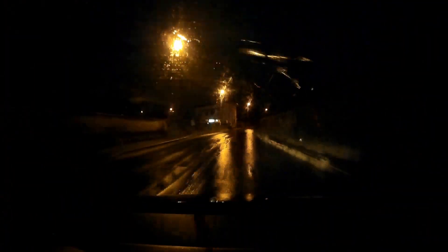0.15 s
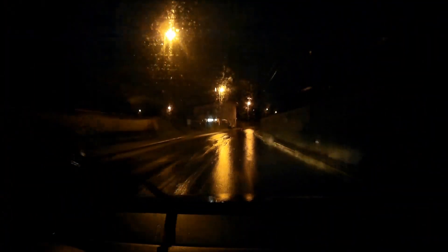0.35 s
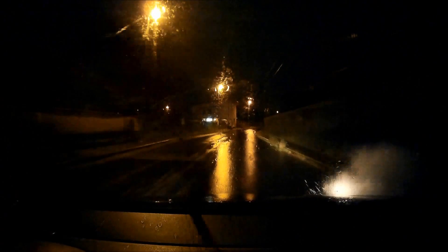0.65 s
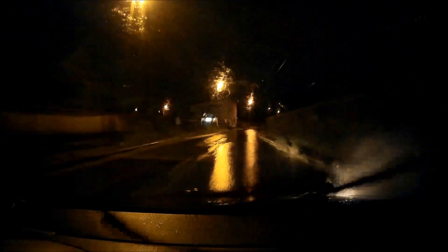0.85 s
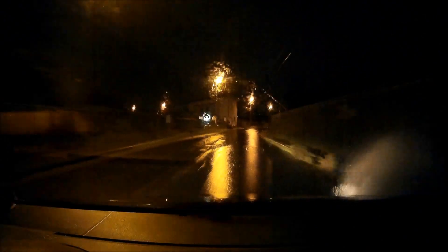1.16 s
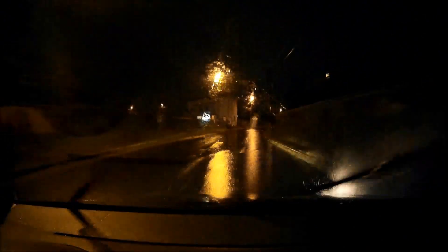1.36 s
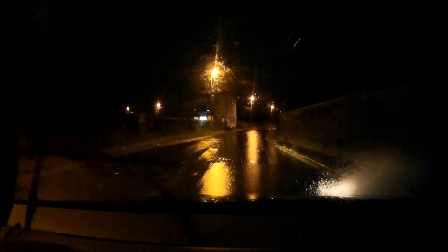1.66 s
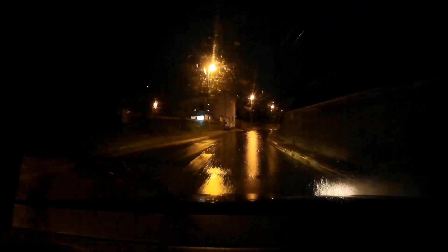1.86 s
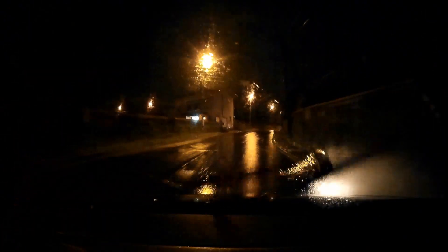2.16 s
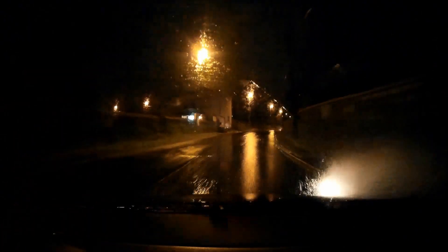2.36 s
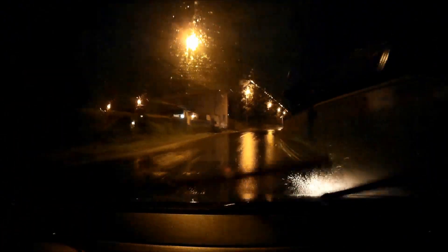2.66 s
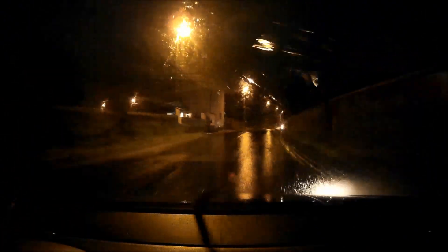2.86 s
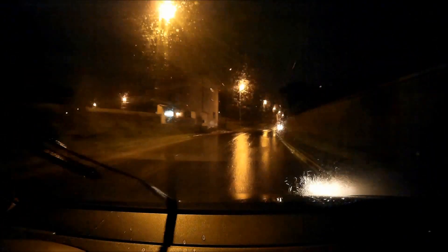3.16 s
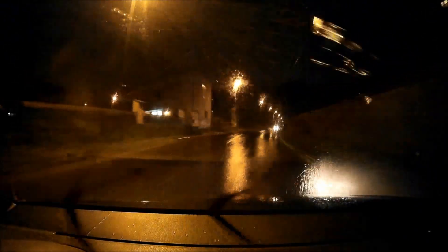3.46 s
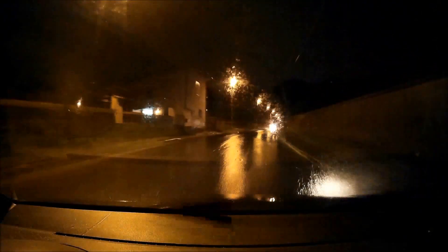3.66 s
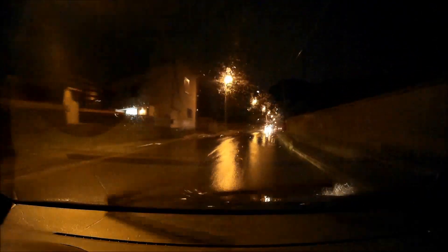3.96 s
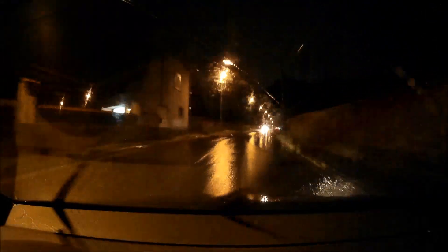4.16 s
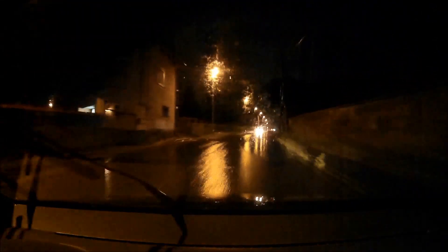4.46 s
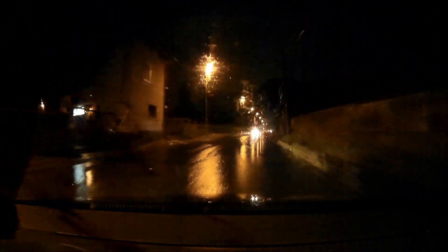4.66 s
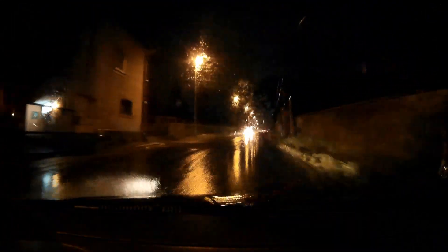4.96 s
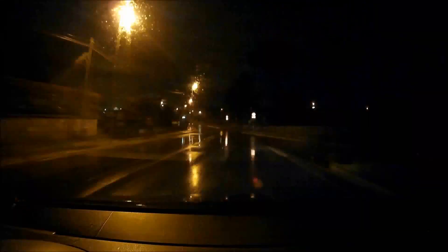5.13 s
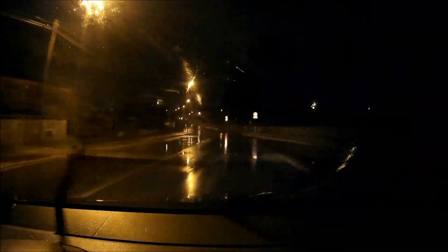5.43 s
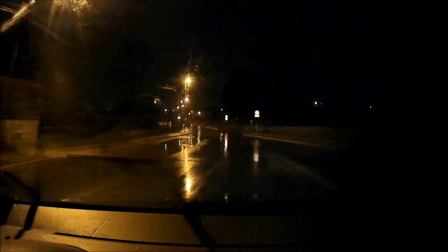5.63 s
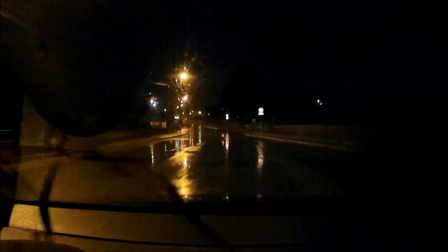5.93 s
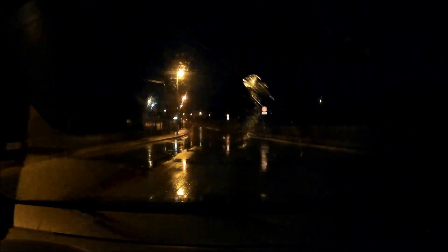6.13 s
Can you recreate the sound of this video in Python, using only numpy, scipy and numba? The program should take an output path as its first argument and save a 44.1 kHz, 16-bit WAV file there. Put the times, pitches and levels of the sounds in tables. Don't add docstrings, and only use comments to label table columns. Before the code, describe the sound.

Inside a car driving through heavy rain, a low engine boom hums while water rumbles and thumps under the floor and drops patter on glass.

```python
import sys
import numpy as np
from scipy import signal
from scipy.fft import rfft, irfft, next_fast_len
from scipy.io import wavfile
from scipy.ndimage import uniform_filter1d
from numba import njit

SR = 44100
rng = np.random.default_rng(int(sys.argv[2]) if len(sys.argv) > 2 else 0)


def volts_from_db(level):
    exponent = np.asarray(level, float) / 20
    return 10 ** exponent


def store_wav(level_fs):
    pcm = np.round(np.clip(np.atleast_2d(level_fs), -1, 1) * 32767)
    wavfile.write(sys.argv[1], SR, pcm.T.astype(np.int16))


N = 277389
T = np.arange(N) / SR
HZ = np.fft.rfftfreq(next_fast_len(N), 1 / SR)


def curves(table):
    s, *columns = np.transpose(table)
    return [np.interp(T, s, c) for c in columns]


def unit(x):
    return x / np.sqrt(np.mean(x ** 2))


def walk(rate):
    k = int(SR / rate)
    held = np.repeat(rng.standard_normal(N // 64), k)[:N]
    return 1.413 * uniform_filter1d(uniform_filter1d(held, k), k)


def humps(s, size, length):
    return sum(a * np.exp(-((T - t) / w) ** 2) for t, a, w in zip(s, size, length + 0 * s))


def lift(hz, resonances):
    return sum(db / (1 + (2 * (hz - f) / width) ** 2) for f, width, db in resonances)


# f/Hz, width/Hz, lift/dB
CABIN = [(62.6, 19, 7.5), (125, 14, 4.5), (178, 4.4, 0), (218, 2.4, 3.5), (354.6, 47, 7.5), (515, 103, 5),
         (770, 26, 6.5), (955, 125, 3), (2540, 420, 2.5)]


def colour(points):
    hz, db = np.transpose(points)
    source_db = np.interp(np.log(HZ + 1), np.log(hz), db, left=-120, right=-120)
    return volts_from_db(source_db + lift(HZ, CABIN))


def restless(source, points, slow_db, flicker_db, rate):
    spectrum = rfft(source, 2 * len(HZ) - 2) * colour(points)
    swell = walk(rate)
    octave = np.log2(HZ + 1)
    lowest, highest = np.log2(points[0][0]), np.log2(points[-1][0])
    out = 0
    for centre in np.arange(lowest, highest + .5, .5):
        window = np.cos(np.pi * np.clip(octave - centre, -.5, .5)) ** 2
        band = irfft(spectrum * window)[:N]
        out = out + band * volts_from_db(slow_db * swell + flicker_db * walk(rate * 1.7))
    return unit(out)


@njit
def rings(start, hz, t60, size, n, sr):
    out = np.zeros(n)
    for k in range(len(start)):
        turn = np.exp(2j * np.pi * hz[k] / sr - np.log(1000.) / (t60[k] * sr))
        z = size[k] + 0j
        for i in range(int(start[k] * sr), min(n, int((start[k] + t60[k]) * sr))):
            out[i] += z.imag
            z *= turn
    return out


def strike(s, hz, db, t60, spread, count, smear_s=0.0019):
    chance = rng.standard_normal((len(s), count, 3))
    f = np.clip(hz[:, None] * 2 ** (spread * chance[..., 0]), 50, .45 * SR)
    start = s[:, None] + smear_s * np.abs(chance[..., 1])
    size = volts_from_db(db[:, None] + 1.1 * chance[..., 2]) / np.sqrt(count)
    t60 = np.repeat(t60 + 0 * s, count)
    return rings(start.ravel(), f.ravel(), t60, size.ravel(), N, 1. * SR)


def burst(s, db, t60, low_hz, high_hz, rise_s=0.00039):
    envelope = np.zeros(N)
    for start, size, length in zip(s, volts_from_db(db), t60 + 0 * s):
        k = np.arange(int(start * SR), min(N, int((start + length) * SR)))
        age = (k - k[0]) / SR
        envelope[k] += size * 1000. ** (-age / length) * np.minimum(age / rise_s, 1)
    band = signal.butter(2, [low_hz, high_hz], "band", fs=SR, output="sos")
    noise = signal.sosfilt(band, envelope * rng.standard_normal(N))
    return noise * np.sqrt(SR / 2 / (high_hz - low_hz))


def shower(per_s, spread_db, tail_s):
    hits = (rng.random(N) < per_s / SR) * volts_from_db(spread_db * rng.exponential(size=N).clip(0, 3.2))
    tail = np.exp(-np.arange(1024) / (tail_s * SR))
    power = signal.fftconvolve(hits ** 2, tail ** 2)[:N].clip(0)
    return unit(np.sqrt(power) * rng.standard_normal(N))


# t/s, f/Hz, level/dB
BOOM = [(0.0, 40.1, -6.5), (0.17, 36.58, -16), (0.65, 35.36, -18.5), (1.05, 34.4, -18), (1.28, 33.7, -12.5),
        (1.45, 34.48, -17.5), (2.1, 34.01, -14), (2.67, 34.08, -15.5), (2.8, 41.2, -29.5),
        (3.06, 48.1, -21), (3.47, 47.7, -33), (3.7, 37.68, -29), (3.8, 36.02, -16), (4.05, 42.53, -19.5),
        (5.12, 42.66, -18.5), (5.3, 45.34, -21), (5.6, 44.98, -26.5), (6.29, 46.44, -20)]
# t/s, depth/dB, length/s
FALTERS = [(0.05, 17.5, 0.064), (0.723, 16, 0.026), (2.79, 22, 0.017), (2.991, 18, 0.047),
           (3.167, 27, 0.042), (3.285, 22, 0.055), (3.544, 2, 0.021), (3.67, 3, 0.031), (3.749, 14, 0.023),
           (3.855, 10, .02), (3.95, 4, 0.031), (5.205, 7, 0.038), (5.423, 14, 0.041), (5.777, 8, 0.027),
           (5.911, 21, 0.029), (6.08, 15, .02)]
# multiple, level at full load/dB
OVERTONES = [(2, -36.5), (3, -47), (4, -43), (5, -44.5)]
# f/Hz, width/Hz, lift/dB
EXHAUST = [(225.7, 6.4, 3), (130, 14, 6)]


def engine():
    full_load_db, overtone_follow = -16.5, 0.84
    hz, db = curves(BOOM)
    phase = 2 * np.pi * np.cumsum(hz * (1 + 0.00632 * walk(12))) / SR
    tone = volts_from_db(db - humps(*np.transpose(FALTERS)) + 0.88 * walk(21.9)) * np.sin(phase)
    for k, level_db in OVERTONES:
        level_db = level_db + overtone_follow * (db - full_load_db) + lift(k * hz, EXHAUST)
        tone += volts_from_db(level_db + 1.7 * walk(15)) * np.sin(k * phase + 0.88 * walk(9))
    return np.sqrt(2) * tone


# t/s, level/dB, length/s, f/Hz
DRONES = [(.2, -33.5, 0.19, 126.5), (1.328, -32, 0.17, 221), (1.7, -39, 0.28, 131.4),
          (2.1, -34.5, 0.16, 133), (3.97, -28, .14, 127), (4.397, -35, 0.23, 127),
          (.84, -31.5, 0.057, 120.4), (1.08, -32.5, .07, 134), (4.08, -32, 0.079, 178),
          (3.95, -33.5, .1, 221.6), (4.8, -28, 0.12, 126.7), (5.05, -34, 0.056, 127.2),
          (5.286, -31.5, 0.096, 220.8), (4.45, -33, 0.061, 178), (6.049, -34, 0.27, 92.8),
          (6.2, -32, 0.074, 122.4), (1.93, -33, .08, 130), (.63, -33, .07, 120), (.72, -35, .06, 150),
          (.38, -35, .06, 125), (4.6, -35, .08, 128), (3.42, -36, .08, 140), (3.57, -36, .06, 150),
          (3.9, -34, .08, 158), (4.12, -33, .05, 150), (5.12, -35, .1, 385), (5.08, -37, .08, 540),
          (5.78, -35, .07, 215), (1.53, -37, .06, 780)]


def drones():
    tones = 0
    for s, db, length, hz in DRONES:
        tones = tones + volts_from_db(db) * np.exp(-((T - s) / length) ** 2) * np.sin(2 * np.pi * hz * T)
    return np.sqrt(2) * tones


# t/s, level/dB
ROAD = [(0.0, -25), (0.45, -28), (0.6, -27), (1.0, -30), (1.35, -26), (1.63, -27.5), (2.45, -30),
        (2.6, -23.5), (2.85, -27.5), (2.97, -31), (3.62, -34), (3.94, -28.5), (4.13, -23), (4.24, -32),
        (4.6, -30), (4.8, -29), (5.78, -28.5), (6.29, -39)]
# f/Hz, level per Hz/dB
RUMBLE = [(40, -33), (60, -6), (75, -12.5), (95, -6), (130, -3.5), (240, -7), (450, -27.5), (900, -33)]


def tyres():
    depth_db, = curves(ROAD)
    return volts_from_db(depth_db + 0.13) * restless(rng.standard_normal(N), RUMBLE, 0.94, 1.0, 6)


# t/s, lift/dB (negative where the shaking eases)
JOLTS = [(.41, 13), (.84, 13), (1.29, 9.5), (1.53, 5), (2.15, 7), (2.5, 5), (3.08, 3.5), (3.35, 5.5),
         (4.05, 3.5), (4.29, 0), (4.68, -2), (5.07, 7), (5.62, 8), (5.78, 9), (6.0, 3.5), (6.2, 5.5)]
# f/Hz, level per Hz/dB
SHAKE = [(18, -15.5), (30, -0.5), (45, -9), (58, -2), (72, -15), (95, -10.5)]


def suspension():
    shake_db = -33.5 + humps(*np.transpose(JOLTS), 0.14)
    return volts_from_db(shake_db) * restless(rng.standard_normal(N), SHAKE, 0.52, 0.2, 7.3)


# t/s, lift/dB, length/s
SURGES = [
    (.5, 1.5, 0.22),
    (1.024, 3, 0.13),
    (1.31, 3.5, 0.12),
    (2.063, 1.5, 0.12),
    (2.632, 1, 0.074),
    (3.301, -1, 0.58),
    (3.924, 3, 0.041),
    (4.359, 3, 0.054),
    (4.84, 2, 0.13),
    (5.243, 2.5, 0.24),
]
# f/Hz, level per Hz/dB
WASH = [(150, -20.5), (300, -0.5), (500, -2.5), (800, -3.5), (1050, -9), (1300, -15), (1600, -15),
        (2200, -60)]


def floor_wash():
    (depth_db,), (rain_db,) = curves(ROAD), curves(RAIN)
    wash_db = -32.5 + 0.022 * (depth_db - depth_db.mean()) + 0.49 * (rain_db - rain_db.mean())
    wash_db += humps(*np.transpose(SURGES))
    lumps = rng.standard_normal(N) + 0.37 * shower(150, 4.3, 0.0026)
    return volts_from_db(wash_db) * restless(lumps, WASH, 0.38, 0.22, 9)


# t/s, peak level/dB, ring f/Hz, panel relative level/dB, panel f/Hz
THUMPS = [(0.169, -19.5, 227, -6, 830), (0.248, -22, 216, -12, 553), (1.002, -24.5, 304, 5, 773),
          (1.521, -16.5, 195, -5, 690), (2.533, -22, 164.4, -4, 550.2), (2.57, -25, 169, -1, 830),
          (2.609, -16, 237.7, -21, 551), (2.677, -14.5, 150, -8.5, 565), (2.819, -18, 185, -36, 770),
          (2.89, -16.5, 184, -15, 714), (3.833, -22.5, 190, -3, 770), (3.91, -10, 148, -14, 748),
          (3.978, -28.5, 237, 2, 793), (4.035, -27, 180, -1, 545), (4.108, -12.5, 265, -7, 748),
          (4.17, -19, 200, -16, 940), (4.235, -12.5, 211, -22, 740.8), (5.558, -17, 178, -22, 726),
          (6.209, -30, 316.8, -5, 647.5)]


def floor_thumps():
    rise_s = 0.0042
    s, db, hz, panel_db, panel_hz = np.transpose(THUMPS)
    panel_db = db + panel_db
    thumps = strike(s, hz, db - 5.0, 0.1, 0.274, count=7, smear_s=rise_s)
    thumps += strike(s, panel_hz, panel_db - 1.5, 0.083, 0.097, count=7, smear_s=rise_s)
    thumps += burst(s, db - 13.5, 0.084, 137, 530, rise_s)
    return thumps + burst(s, panel_db - 13.5, 0.16, 500, 1200, rise_s)


# t/s, peak level/dB, f/Hz, t60/s, rise/s
KNOCKS = [(6.0204, -38, 8000, .028, .001), (6.021, -43, 8400, .03, .001), (3.2, -22, 180, 0.074, .004),
          (2.714, -20, 186, .05, .003), (2.655, -20, 155, .06, .004), (5.4, -29, 330, 0.13, 0.011),
          (5.38, -34, 510, .15, .01), (6.1245, -25, 1460, 0.024, 0.002), (2.814, -15, 190, .06, .004),
          (2.826, -19, 310, .04, .003), (2.891, -17, 170, .06, .003), (2.46, -21, 370, .05, .004),
          (2.478, -21, 360, .05, .004), (6.1226, -33, 5100, 0.015, .0006), (6.1228, -35, 5300, .014, .0006),
          (6.123, -33, 2650, .02, .001), (5.6, -34, 4480, .018, .002), (6.2832, -4, 5000, 0.011, 0.0018),
          (6.2835, -12, 5300, .011, .0015), (6.2835, -25, 6200, 0.018, .001),
          (6.283, -28, 3300, 0.018, .001), (6.285, -22, 1840, 0.027, .002), (6.284, -24, 890, .08, .002),
          (6.2835, -30, 6870, .03, .001), (6.284, -33, 8100, .03, .001), (2.6, -14.5, 270, .045, .003),
          (2.889, -22, 726, .05, 0.0018), (3.832, -21, 770, 0.076, .004), (3.906, -19, 340, 0.14, 0.0072),
          (4.046, -20, 350, 0.12, 0.0046), (4.044, -22, 730, 0.036, .001),
          (4.107, -12.5, 770, 0.048, 0.0028), (4.113, -17, 208, 0.073, 0.0047),
          (4.236, -19, 256, 0.045, .003), (3.843, -17, 330, .05, 0.0027), (2.9, -23, 890, 0.081, .004),
          (2.71, -23, 576, 0.065, .004), (4.81, -21, 493, 0.15, .012), (5.7, -21, 280, 0.17, .012)]


def knocks():
    s, db, hz, t60, rise_s = np.array(KNOCKS, float).T.copy()
    faster_t60 = 1 / (1 / t60 + 1 / (np.log(1000) * rise_s))
    return rings(s, hz, t60, volts_from_db(db), N, 1. * SR) - rings(s, hz, faster_t60, volts_from_db(db), N, 1. * SR)


# t/s, peak level/dB, middle and treble relative level/dB, t60/s
CLICKS = [(2.1807, -34, 4, -6, .02), (2.1924, -48, 3, -2, .02), (2.2924, -47, 8, -4, .024),
          (2.3117, -41, 2, -3, .03), (5.1598, -22, 3, -14, .012), (5.687, -41, 8, -16, .024),
          (5.8218, -42, 6, -9, .024), (5.8397, -44, 12, -16, .024), (5.973, -26.5, 2, -13, 0.025),
          (6.0198, -26.5, 1, -16, .02), (6.1226, -24, 3, -8, .03), (6.225, -42, 10, -10, .04),
          (6.2828, -14, -4, -16, .03)]


def clicks():
    s, db, mid_db, treble_db, t60 = np.transpose(CLICKS)
    treble_db = db + treble_db
    crack = burst(s, db + mid_db - 11, t60, 1060, 4800)
    crack += burst(s, db - 18, t60, 5050, 6500)
    crack += burst(s, treble_db - 6.5, t60, 8100, 9500)
    crack += burst(s, treble_db - 8.0, t60, 9900, 12300)
    crack += burst(s, treble_db - 17, t60, 12600, 15500)
    snap = burst(s, treble_db - 7, .009, 4000, 13000)
    tail = burst(s, treble_db - 12, 2.7 * t60, 4000, 13000, .002)
    return crack + snap + tail


# t/s, peak level/dB, f/Hz, t60/s, spread/octaves
PINGS = [
    (6.1232, -38, 11500, 0.028, 0.045),
    (6.1232, -44, 14800, .02, .03),
    (6.0205, -51, 15100, .03, .02),
    (.2, -50, 15300, .03, .015),
    (5.9735, -41, 8300, .02, .05),
    (6.284, -38, 15000, .015, .02),
    (6.284, -31.5, 11200, .02, .04),
]


def pings():
    s, db, hz, t60, spread = np.transpose(PINGS)
    return strike(s, hz, db, t60, spread[:, None], count=5, smear_s=.0006)


# t/s, peak level/dB
BUZZ = [
    (.027, -46),
    (0.046, -44),
    (.067, -48),
    (.088, -44),
    (.111, -48),
    (.205, -50),
]


def buzz():
    s, db = np.transpose(BUZZ)
    body = strike(s, 5000 + 0 * s, db, 0.025, .04, count=4)
    return body + strike(s, 11000 + 0 * s, db - 5.5, .03, .09, count=8, smear_s=0.0026)


# t/s, peak level/dB, treble relative level/dB
DROPS = [(0.067, -35, -10), (0.186, -29.5, -12), (0.369, -34, -19.5), (0.5117, -31.5, -11),
         (0.991, -33, -18), (1.1069, -33, -17), (1.4285, -35, -13), (1.4584, -32.5, -19),
         (1.505, -31.5, -20), (1.609, -36, -17), (1.6213, -33, -11), (1.8098, -34, -15),
         (1.8373, -30.5, -20), (2.3385, -37, -15), (3.1173, -35.5, -10), (3.239, -33, -17),
         (3.3206, -30.5, -20), (3.3603, -34, -17), (3.675, -34, -11), (3.7205, -36, -17),
         (3.824, -28.5, -22), (3.8748, -31.5, -14), (3.91, -37, -18), (3.9924, -33, -19), (4.07, -35, -19),
         (4.1103, -37, -20), (4.1604, -33, -13), (4.5585, -34.5, -19), (4.746, -37, -20)]
# t/s, peak level/dB
SPITS = [(0.085, -39), (0.1486, -43), (0.182, -40), (2.7765, -47), (1.1034, -46), (1.4291, -40),
         (1.4874, -45), (1.506, -45), (1.6207, -50), (1.8098, -44), (1.837, -45), (1.941, -58),
         (1.978, -46), (2.179, -37), (2.312, -37), (3.1346, -46), (3.239, -40), (3.3807, -46),
         (3.4705, -44), (3.676, -43), (3.7211, -40), (3.8112, -45), (3.876, -47), (3.9884, -41),
         (4.1618, -48), (4.4133, -44), (4.5582, -44), (4.837, -45), (1.5469, -45), (6.0627, -43),
         (.2069, -45), (.5082, -48), (.5556, -46), (1.0056, -47), (1.044, -48), (1.4591, -46),
         (1.6081, -47), (1.774, -50), (1.852, -47), (2.144, -46), (2.2682, -47), (2.339, -40), (2.396, -54),
         (2.8903, -47), (3.492, -46), (3.5169, -47), (3.6027, -45), (3.7708, -48), (3.9084, -46),
         (3.9402, -43), (4.432, -46), (4.6743, -47), (4.7237, -47), (4.7462, -45), (4.8194, -46),
         (5.0888, -48), (5.1103, -45), (5.1981, -44), (6.042, -50), (6.0856, -46)]


def glass_drops():
    s, db, treble_db = np.transpose(DROPS)
    drops = burst(s, db - 5.0, 0.042, 1850, 3080, 0.0022)
    drops += burst(s, db - 10.5, 0.026, 2400, 4900, 0.0017)
    drops += burst(s, db + treble_db - 7, 0.019, 5500, 14000, .001)
    s, db = np.transpose(SPITS)
    drops += burst(s, db - 4.5, 0.012, 3700, 11000)
    when, weakness = rng.random((30, 2)).T
    drops += burst(when * T[-1], -56 - 8 * weakness, 0.019, 1800, 10500)
    when, weakness = rng.random((160, 2)).T
    return drops + burst(when * T[-1], -59 - 8 * weakness, 0.012, 3800, 13000)


# t/s, peak level/dB, ring f/Hz
TAPS = [(.2388, -37, 2370), (.2727, -37, 2060), (.3111, -37, 1870), (.394, -35, 1830), (.4538, -35, 2270),
        (.6433, -35, 2350), (.9022, -37, 2690), (1.0125, -33, 2390), (1.0429, -35, 2420),
        (1.2689, -36, 1930), (1.3318, -35, 1910), (1.3926, -36, 2340), (1.5468, -31, 2500),
        (1.72, -36, 2370), (1.7528, -29, 2300), (1.774, -34, 2800), (1.7967, -37, 2320),
        (1.9998, -37, 2040), (2.144, -36, 2320), (2.3973, -36, 2360), (2.5645, -36, 1500),
        (2.7266, -37, 2240), (2.8902, -35, 1500), (3.2908, -38, 1840), (3.4909, -39, 2430),
        (3.5866, -38, 2020), (3.9408, -35, 2710), (4.0455, -28, 900), (4.109, -30, 1350),
        (4.2985, -39, 2560), (4.4387, -39, 2480), (4.5599, -38, 5400), (4.7465, -40, 4300),
        (4.8374, -41, 4600), (4.85, -42, 4600), (4.8997, -39, 3600), (4.915, -42, 5000),
        (5.1094, -39, 4300), (5.1441, -38, 2820), (5.974, -38, 4800), (6.1235, -33, 3600),
        (6.124, -36, 6000), (6.1245, -32, 1900)]


def roof():
    s, db, hz = np.transpose(TAPS)
    ring = strike(s, hz, db - 5, 0.019, .15, count=6, smear_s=.0015)
    return ring + burst(s, db - 10.5, .012, 2000, 6000, .001)


# t/s, level/dB
RAIN = [(0.0, -45.5), (0.23, -44.5), (0.42, -43), (0.91, -42.5), (1.78, -45), (1.95, -44), (2.36, -44.5),
        (3.67, -46.5), (3.95, -46), (4.57, -46), (4.99, -44.5), (5.24, -47), (5.64, -47), (5.92, -46),
        (6.27, -46)]
# f/Hz, level per Hz/dB
PATTER = [(700, -11), (1400, 1.5), (1900, -2.5), (2600, -4), (3300, -10), (4200, -16.5), (5500, -19.5),
          (7000, -55)]
# f/Hz, level per Hz/dB
SPRAY = [(3000, -2), (5000, -0.5), (7500, -2), (10000, -5.5), (11500, -3.5), (13000, -8.5), (15500, -12),
         (17000, -15)]


def rain():
    patter_db, = curves(RAIN)
    spray_db = -59.5 + 0.34 * (patter_db - patter_db.mean())
    drops = shower(260, 3.0, 0.008)
    patter = restless(rng.standard_normal(N) + 0.61 * drops, PATTER, 0.28, 0.32, 10)
    spray = restless(rng.standard_normal(N) + 0.5 * drops, SPRAY, 0.74, 0.23, 24)
    return volts_from_db(patter_db + 1.0) * patter + volts_from_db(spray_db) * spray


def gush():
    peak_s, peak_db, rise_db_s, fall_db_s = 2.318, -50.5, 352, 200
    drop_db = np.where(T < peak_s, rise_db_s * (peak_s - T), fall_db_s * (T - peak_s))
    fizz = restless(shower(900, 2.06, 0.0032), SPRAY, 0.51, 1.25, 20)
    return volts_from_db(peak_db - drop_db) * fizz


# f/Hz, level/dB
TICK = [(14829, -80), (15503, -88)]


def electronics():
    whine_hz, flip_hz, whine_db = 9525.4, 36.35, -71.7
    flips = np.clip(5 * np.sin(2 * np.pi * flip_hz * T), -1, 1)
    whine = volts_from_db(whine_db) * flips * np.sin(2 * np.pi * whine_hz * T)
    on = uniform_filter1d(1. * (np.abs(T % 1 - .39) < .1), size=400)
    tick = sum(volts_from_db(db) * np.sin(2 * np.pi * hz * T) for hz, db in TICK)
    return np.sqrt(2) * (whine + on * tick)


def scene():
    mix = engine() + drones()
    mix += tyres() + suspension() + floor_wash() + floor_thumps() + knocks()
    mix += clicks() + pings() + buzz()
    mix += glass_drops() + roof() + rain() + gush() + electronics()
    return (mix * np.minimum(T * 500 + .3, 1))[None]


def top_cut(x):
    return signal.sosfilt(signal.butter(12, 15690, fs=SR, output="sos"), x)


def record(dry):
    top = signal.ellip(12, .2, 30, 15650, fs=SR, output="sos")
    return top_cut(signal.sosfilt(top, dry))


dry = scene()
out = record(dry)
store_wav(out)
```